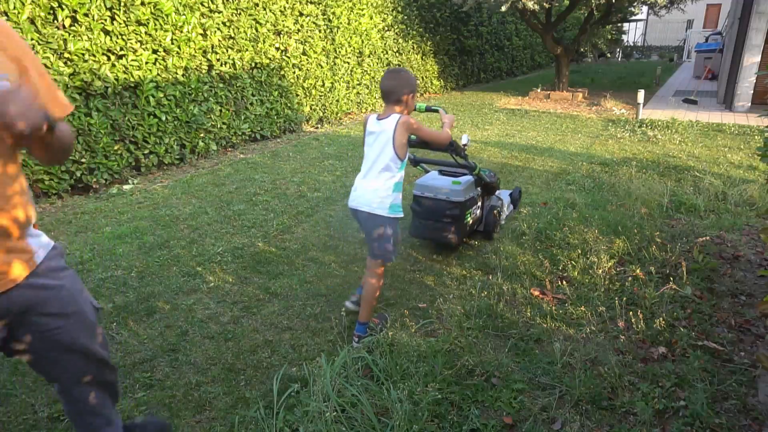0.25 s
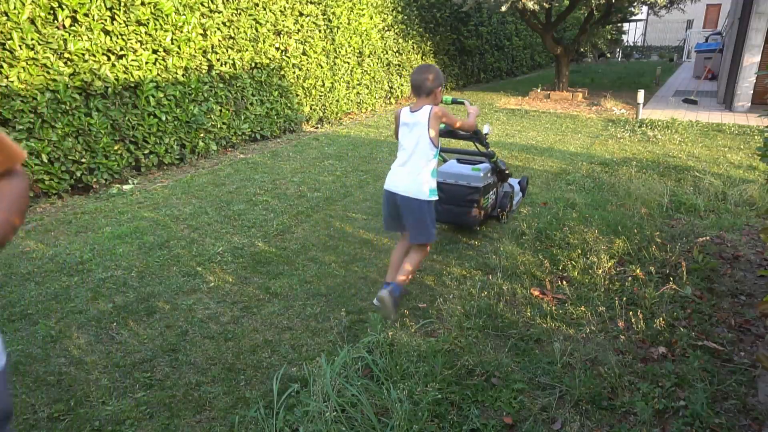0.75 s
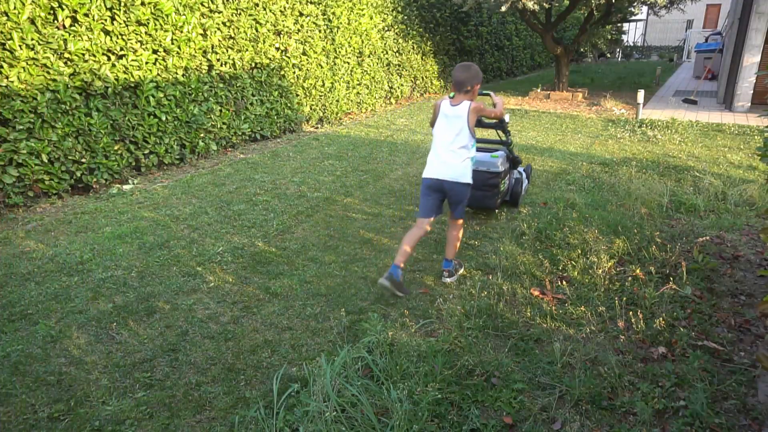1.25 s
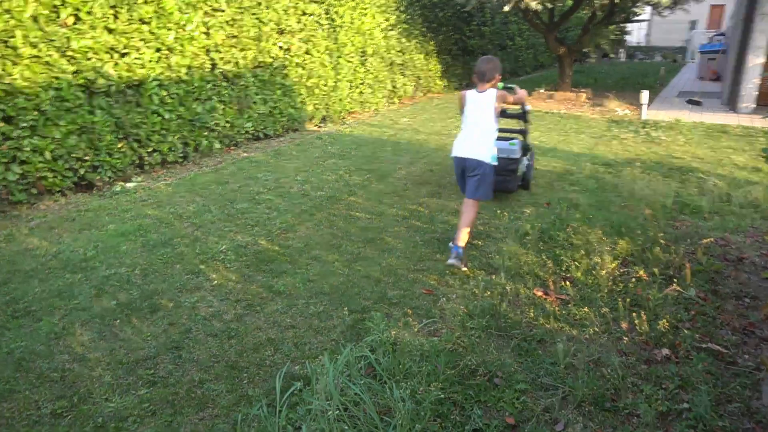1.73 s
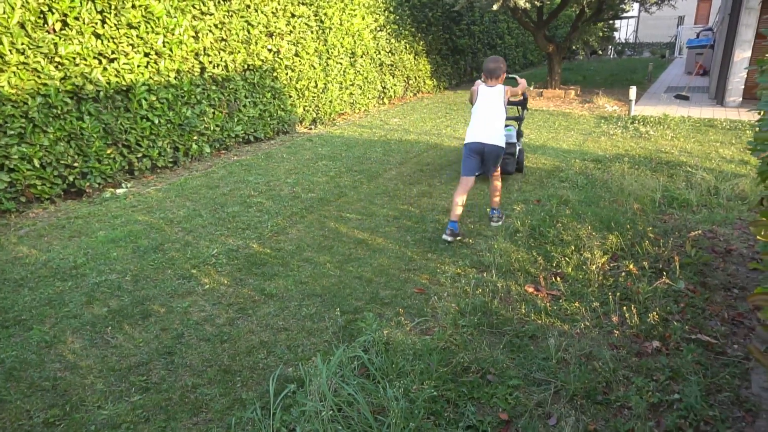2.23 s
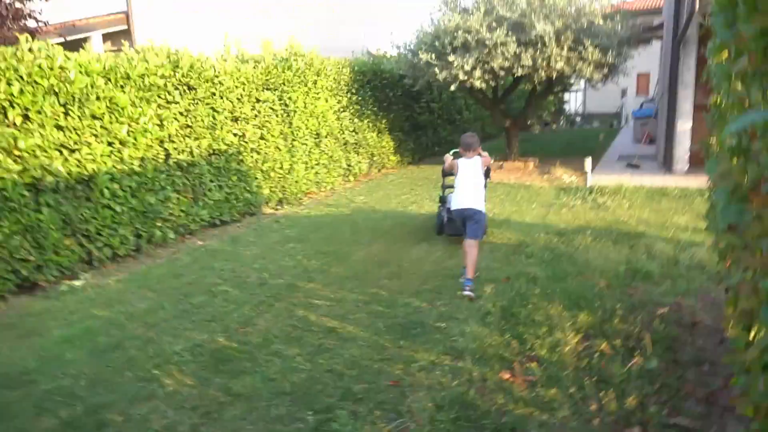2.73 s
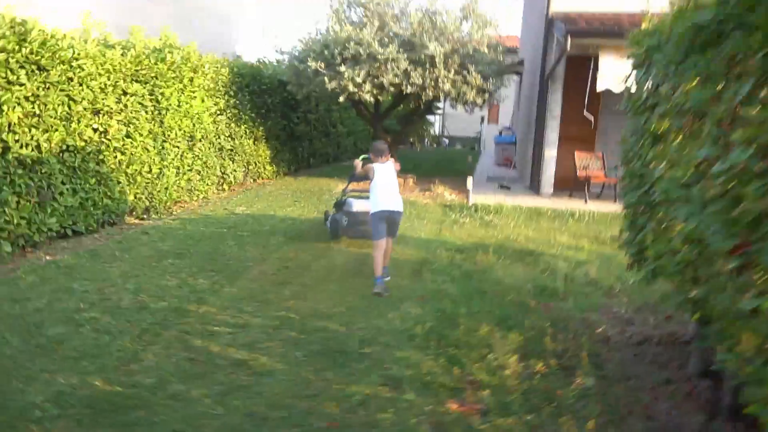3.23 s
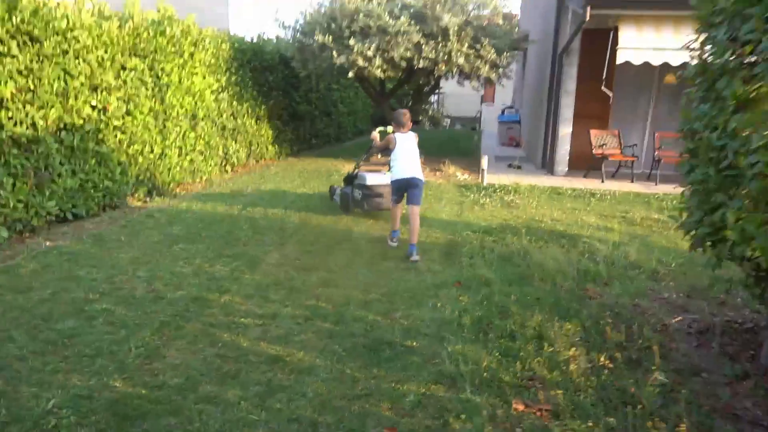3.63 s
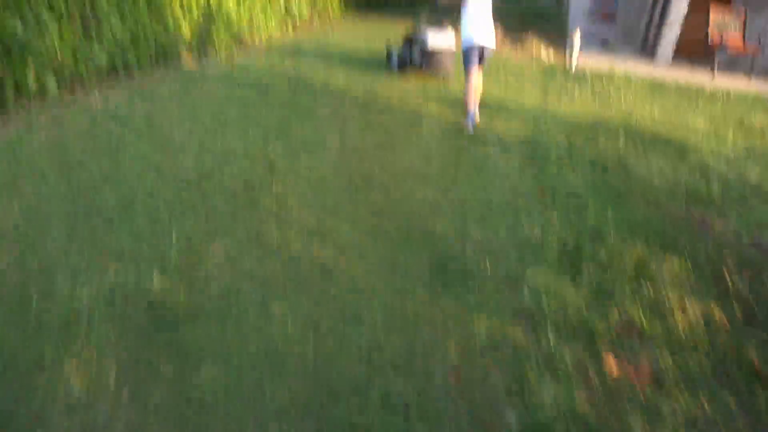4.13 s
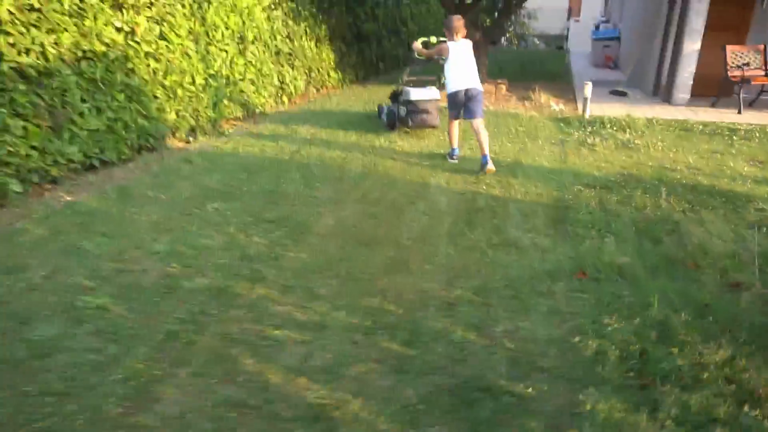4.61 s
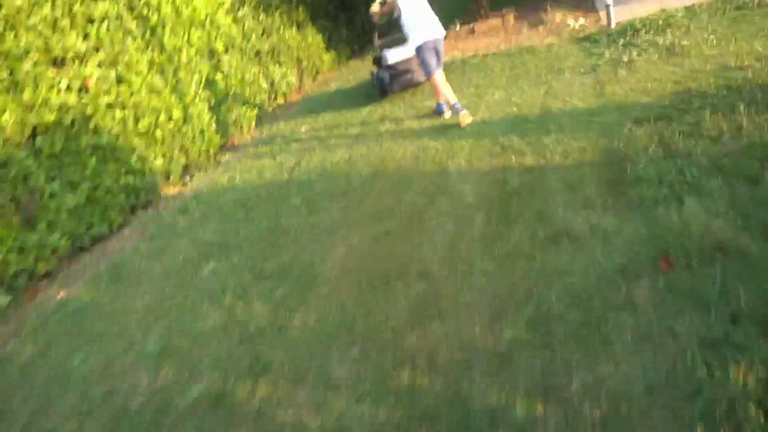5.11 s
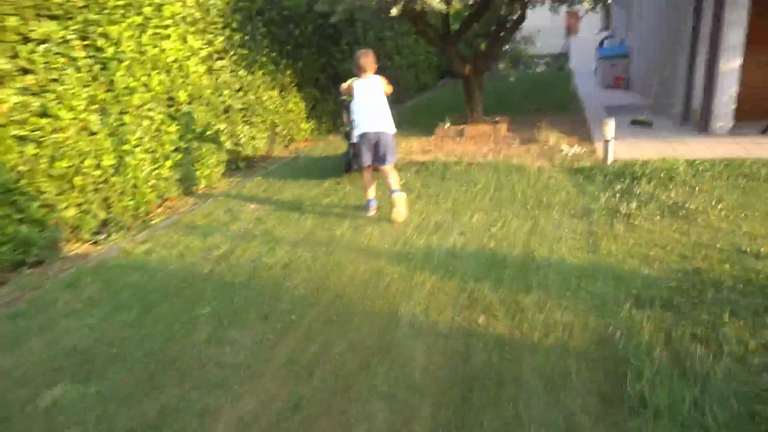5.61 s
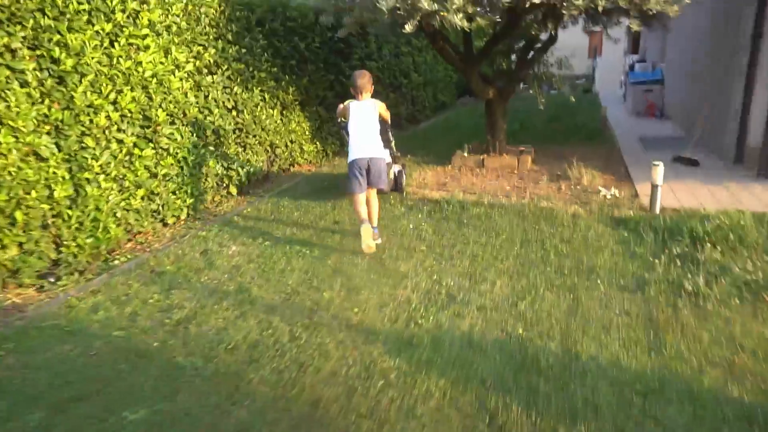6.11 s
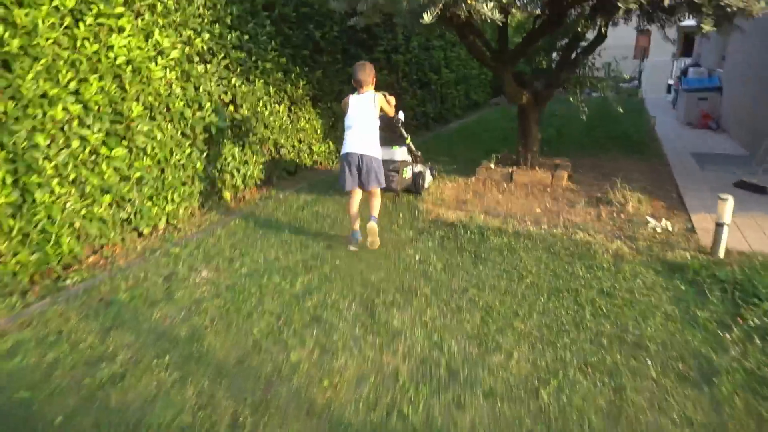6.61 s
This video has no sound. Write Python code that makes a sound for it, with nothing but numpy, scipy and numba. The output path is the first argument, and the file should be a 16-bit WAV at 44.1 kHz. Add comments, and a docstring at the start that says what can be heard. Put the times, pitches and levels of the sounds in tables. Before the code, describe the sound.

In a garden, a battery mower runs continuously with a low hum around 100 Hz, pulsing airy rush and hissing shredded grass. It draws away as bits tick on its housing. A hard bright clack cracks close by before three seconds, with tiny bounces. Wind then thumps and rumbles on the hand-held microphone, while grass rustles and stems snap under following feet.

```python
"""A battery lawn mower is pushed away across a garden lawn, followed on foot by a hand-held camera.
Its two-armed blade hums as sine lines and blurred overtones; air under the deck is coloured noise that
puffs with each arm; shredded grass is hiss and fine crackle; bits tick against the housing as noise bursts.
Grass rustles underfoot as clumped grains, something hard clacks close by in short modes and noise;
slow and fast swirls of noise are wind that buffets the microphone and briefly chokes it."""
import sys
import numpy as np
from scipy import signal
from scipy.fft import rfft, irfft, next_fast_len
from scipy.io import wavfile
from scipy.ndimage import uniform_filter1d, map_coordinates
from numba import njit

SR = 44100
rng = np.random.default_rng(int(sys.argv[2]) if len(sys.argv) > 2 else 0)


def waveform_to_disk(signal):
    """Save audio, clipped to [-1, 1], as 16-bit WAV at the path in sys.argv[1]."""
    frames = np.transpose(np.atleast_2d(signal))
    scaled = np.clip(frames, -1, 1) * 32767
    samples = np.round(scaled).astype(np.int16)
    wavfile.write(sys.argv[1], SR, samples)


N = 302251
TIME = np.arange(N) / SR
# reference level of the rush of air with the mower far off (dB)
FAR_DB = -28
# colour of the crack of a hard blow: hz, density_db (dB per Hz)
CRACK_COLOUR = [(1200, -33), (2200, 0.5), (3200, 0), (4000, -10), (4800, 3.5), (6700, 3.5), (7500, -6.5),
                (13500, -8), (15800, -23)]


def undb(db):
    """Decibels to gain."""
    return 10 ** (np.asarray(db) / 20)


def unit(x):
    """Scale to rms 1."""
    return x / np.sqrt(np.mean(x ** 2))


def curves(table):
    """Each column of a timed table, one value a sample."""
    s, *columns = np.transpose(table)
    return [np.interp(TIME, s, column) for column in columns]


def colour(x, spectrum):
    """Filter by (Hz, dB) points, joined along log frequency; the result has rms 1."""
    hz, db = np.transpose(spectrum)
    bins_hz = np.maximum(np.arange(len(x) // 2 + 1) * SR / len(x), 1)
    gain = undb(np.interp(np.log(bins_hz), np.log(hz), db))
    return unit(irfft(rfft(x) * gain, len(x)))


def noise(spectrum):
    """Coloured noise of rms 1."""
    return colour(rng.standard_normal(next_fast_len(N, True)), spectrum)[:N]


def walk(rate):
    """A smooth random wander of rms 1 through `rate` random points a second."""
    points = rng.standard_normal(1024)
    return unit(map_coordinates(points, [TIME * rate], order=2, mode="wrap"))


def fade(t, t60):
    """Exponential decay, 60 dB down after t60 seconds."""
    return np.exp(-np.log(1000) * t / t60)


def add(track, s, sound):
    """Mix a sound into the track at time s."""
    start = int(s * SR)
    track[start:start + len(sound)] += sound[:N - start]


def bell(s, length):
    """A smooth rise and fall around time s, `length` seconds wide at half height."""
    return .5 ** np.minimum((2 * (TIME - s) / length) ** 2, 60)


def swells(events):
    """Overlapping (s, length, dB) swells add in power; gives their joint power."""
    return sum(undb(db) ** 2 * bell(s, length) for s, length, db in events)


def grains(rate, spread_db, spectrum):
    """Tiny snaps at random times, `rate` a second, most small and a few large; rms 1."""
    sizes = undb(spread_db * np.minimum(rng.exponential(size=N), 5))
    signed = sizes * rng.choice([-1, 1], N)
    return colour(signed * (rng.random(N) < rate / SR), spectrum)


def bursts(events, spectrum, t60, tail_db=-18, tail_t60=0.078):
    """Each blow is a sharp burst of coloured noise with a faint, longer tail."""
    out, t = np.zeros(N), TIME[:SR // 8]
    decay = fade(t, t60) + undb(tail_db) * fade(t, tail_t60)
    for s, peak_db in events:
        burst = colour(rng.standard_normal(len(t)), spectrum) * decay
        add(out, s, undb(peak_db) * burst / np.abs(burst).max())
    return out


def blade_tones(phase, hum_db, air_db, waver=0.11, flutter_db=1.0, hum_flutter_db=1.1):
    """Two low lines, once and twice the blade-pass rate, hum; turbulence blurs the overtones above."""
    # the blade-pass fundamental, as loud as it arrives, before its flutter: time_s, level_db (rms)
    drone = [(0, -26), (.6, -25.5), (1.7, -24.5), (2.3, -25.5), (3, -29), (3.5, -26.5), (5.3, -29),
             (5.8, -34), (6.4, -35)]
    # higher lines: multiple (rounded to a whole one), far_level_db, gain in dB per dB of air swell
    overtones = [(2.95, -37, 1.5), (3.94, -37, 0), (5, -42.5, 1.5), (6, -45, 0.6), (7, -45.5, 1.6),
                 (8, -48, 1), (10, -50.5, 1.6), (30, -62, 1.5)]
    drone_db, = curves(drone)
    out = undb(drone_db + flutter_db * walk(4.57)) * np.sin(phase)
    out = out + undb(hum_db + hum_flutter_db * walk(14)) * np.sin(2 * phase)
    for multiple, far_db, swell in overtones:
        blur = min(waver * multiple, 1)
        turbulence = 1 + blur * (walk(16) + 1j * walk(16))
        line = turbulence * np.exp(1j * (round(multiple) * phase + rng.uniform(0, 2 * np.pi)))
        level = undb(far_db + swell * (air_db - FAR_DB))
        out = out + level * line.imag / np.sqrt(1 + 2 * blur ** 2)
    return np.sqrt(2) * out  # sine levels count as rms


def churn(x, width_hz=150):
    """Turbulence makes each narrow band of the midrange swell and sink on its own."""
    size = next_fast_len(N, True)
    spectrum, out = rfft(x, size), x
    hz = np.arange(size // 2 + 1) * SR / size
    for centre_hz in np.arange(400, 2700, width_hz):
        window = np.maximum(1 - np.abs(hz - centre_hz) / width_hz, 0)
        band = irfft(spectrum * window, size)[:N]
        out = out + band * (undb(2.2 * walk(26)) - 1)
    return out


def deck_air(phase, air_db, depth=0.11, sharpness=2.2, gain_db=1.5, flutter_db=0.42,
             howl_hz=975, howl_db=-23.0, howl_swell=2.0):
    """Churned air hisses and puffs as each blade arm passes the chute; nearer by, the deck howls too."""
    # air under the deck: hz, density_db (dB per Hz)
    air_colour = [(100, -4), (180, 3), (250, 5), (290, 3), (620, 0.13), (850, -2), (970, -1.3),
                  (1300, -2.5), (1800, -10), (2350, -14), (2850, -22.5), (6000, -28.5), (15000, -44.5)]
    howl = noise([(howl_hz / 2, -140), (howl_hz, 0), (howl_hz * 2, -140)])
    howl_gain = undb(howl_db + howl_swell * (air_db - FAR_DB))
    rush = churn(noise(air_colour) + howl * howl_gain)
    body = uniform_filter1d(rush, size=9)  # the puffs lack the treble
    puff = np.exp(sharpness * np.cos(phase))
    puffing = rush + body * depth * unit(puff - puff.mean())
    return puffing * undb(air_db + gain_db + flutter_db * walk(70))


def over_lawn(x, distance_m, deck_m=.2, microphone_m=1.37, ground_db=-21.5):
    """Sound arrives directly and off the ground; the lag shrinks with distance, so the colour shifts."""
    lag_s = 2 * deck_m * microphone_m / distance_m / 343  # speed of sound in m/s
    return x + undb(ground_db) * np.interp(TIME - lag_s, TIME, x)


def grass(phase, grass_db, sweep=0.09, hiss_db=0, crackle_db=-4, patchy_db=1.2):
    """Each sweep of the blade snips many stalks: a hiss with a fine crackle of larger snips."""
    # shredded grass: hz, density_db (dB per Hz)
    grass_colour = [(1500, -6), (2350, 8), (2800, 6.5), (5300, 5), (6900, 2), (8700, 5.5), (10000, -6.5),
                    (11200, -9.5), (13200, -4), (15800, -19)]
    cutting = unit(np.exp(sweep * np.cos(phase) + 0.052 * np.cos(2 * phase)))
    snips = grains(rate=1400, spread_db=4.0, spectrum=grass_colour)
    shredding = undb(hiss_db) * noise(grass_colour) + undb(crackle_db) * snips
    return shredding * cutting * undb(grass_db + patchy_db * walk(25))


def mower(air_1m_db=-12, hum_1m_db=-8.5):
    """Hum, air and grass turn with the blade and weaken with distance; the fundamental has set levels."""
    # the blade's speed drifts by less than one percent: time_s, blade_pass_hz
    speed = [(0, 100), (1.7, 99.55), (2.5, 99.35), (3.15, 100.15), (4.3, 99.8), (5.3, 99.9), (5.6, 99.55),
             (6.4, 99.9)]
    # the mower draws away, then the camera keeps pace: time_s, distance_m
    path = [(0, 3.8), (1.25, 4.06), (1.8, 4.44), (2.25, 5.85), (3.05, 6.9), (3.55, 6.44), (4.4, 7.2),
            (5.3, 6.04), (5.9, 6.35), (6.85, 6.7)]
    # how much grass the blade meets: time_s, hiss_level_db (at 1 m, before its patchiness)
    cutting = [(0, -27), (2.14, -28), (2.35, -32.5), (3.05, -37), (4, -32.5), (5.17, -33), (5.6, -32.5),
               (6.85, -26.5)]
    # the hum swells or sinks for a moment: centre_s, length_s, change_db
    hum_swells = [(.40, 0.15, -3), (1.743, 0.16, 1.5), (2.948, 0.56, -3.5), (3.39, 0.15, 2.5),
                  (3.666, 0.12, 4.5), (4.124, .1, -2), (4.265, 0.12, 6.5), (5.25, .16, 0),
                  (5.682, 0.15, 3.5), (5.974, 0.058, 5), (6.216, 0.068, 5), (6.68, 0.49, 2.5)]
    blade_hz, = curves(speed)
    distance_m, = curves(path)
    cutting_db, = curves(cutting)
    phase = 2 * np.pi * np.cumsum(blade_hz) / SR
    loss_db = 20 * np.log10(distance_m)
    air_db = air_1m_db - loss_db
    hum_db = hum_1m_db - loss_db + sum(db * bell(s, length) for s, length, db in hum_swells)
    air = over_lawn(deck_air(phase, air_db), distance_m)
    return blade_tones(phase, hum_db, air_db) + air + grass(phase, cutting_db - loss_db)


def wind(buffet_db=-2.5, eddies_db=0.0, eddy_floor_db=-44):
    """Swirls push on the microphone; each gust has its own share of slow buffeting and faster eddies."""
    # slow buffeting: hz, density_db (dB per Hz)
    buffet_colour = [(6, 3.5), (14, 10), (36, 0), (50, -21), (75, -22), (200, -74)]
    # its faster eddies: hz, density_db (dB per Hz)
    eddy_colour = [(24, -9), (36, 4), (50, 7.5), (72, -2), (105, -14.5), (400, -92)]
    # gusts, before the two gains: centre_s, length_s, buffet_level_db, eddy_level_db
    gusts = [(0.995, 0.16, -14.5, -37), (1.79, 0.1, -7, -21), (2.017, 0.041, -2.5, -26),
             (2.16, 0.11, -6.5, -31), (2.413, 0.067, -8, -25), (2.59, 0.041, -2, -20),
             (2.856, 0.088, -11, -22), (3.028, 0.06, -0.5, -12.5), (3.196, 0.096, -5.5, -11),
             (3.356, 0.065, -5, -20), (3.703, 0.15, -12, -20), (3.878, 0.039, 0.5, -21),
             (4.573, 0.25, -6.5, -31), (5.355, 0.062, -3.5, -29), (5.578, 0.1, 3.5, -11),
             (5.735, 0.093, -27, -10), (5.92, 0.1, -1.5, -20), (6.118, 0.14, -3.5, -15.5),
             (6.328, 0.089, -1.5, -8.5), (6.744, 0.095, -4.5, -19.5)]
    # the breeze rises once and then stays
    breeze_s, rise_s, calm_db, breeze_db = 1.745, .04, -24.5, -13
    steady_db = np.interp(TIME, [breeze_s, breeze_s + rise_s], [calm_db, breeze_db])
    slow = undb(steady_db) ** 2 + swells((s, length, db) for s, length, db, _ in gusts)
    fast = undb(eddy_floor_db) ** 2 + swells((s, length, db) for s, length, _, db in gusts)
    out, puffs = 0, unit(undb(3 * walk(22)))
    layers = ((buffet_colour, slow, buffet_db, SR // 8), (eddy_colour, fast, eddies_db, SR // 16))
    for spectrum, power, gain_db, span in layers:
        swirl = noise(spectrum) * puffs
        # even out the local power, so that the gusts set it
        local_power = uniform_filter1d(swirl ** 2, size=span)
        out = out + swirl * np.sqrt(power / local_power) * undb(gain_db)
    # the diaphragm stiffens under the hardest pushes
    return .9 * np.tanh(out / .9)


def ticks():
    """Bits of stalk and twig snap against the housing: short bright bursts of noise."""
    # the ticks: start_s, peak_db
    tick_times = [(.955, -20), (1.001, -26), (1.127, -21), (1.182, -22), (1.314, -25), (1.419, -21),
                  (1.558, -25), (1.754, -16), (1.820, -21.5), (4.232, -31), (6.204, -18), (6.366, -18.5)]
    # their colour: hz, density_db (dB per Hz)
    tick_colour = [(800, -35), (2500, 7.5), (5000, -0.5), (8300, 6), (10500, -5.5), (13500, 1),
                   (15800, -15)]
    return bursts(tick_times, tick_colour, t60=0.016)


def knocks():
    """A dull knock: a burst of low noise that dies more slowly than a tick."""
    # the knocks: start_s, peak_db
    knock_times = [(1.757, -5.5)]
    # their colour: hz, density_db (dB per Hz)
    knock_colour = [(60, -14), (240, 9), (650, -7), (2400, -13), (8000, -53)]
    return bursts(knock_times, knock_colour, t60=0.056)


def clack(start_s=2.7776, gain_db=2, crack_db=-3.0, crack_t60=.018, ring_db=-5, wash_db=-22.5,
          wash_t60=0.19, late_wash_s=0.03, late_wash_db=-27, late_wash_t60=0.11):
    """Something hard cracks and rings in short modes; a wash of scattered sound follows in two waves."""
    # what it rings with: hz, relative_level_db, t60_s
    modes = [(1890, -4, .025), (2260, 4, 0.036), (2590, -3, 0.042), (3515, -8.5, 0.08), (4560, -3, 0.038),
             (5600, -12, 0.1), (5900, 0, 0.026), (6400, -3, 0.052)]
    # colour of the wash: hz, density_db (dB per Hz)
    wash_colour = [(1500, -18), (3500, -7), (5700, -1), (7400, -7), (13500, -17), (15800, -24)]
    out, t = np.zeros(N), TIME[:SR // 3]
    ring = 0
    for hz, db, t60 in modes:
        ring = ring + undb(db) * np.sin(2 * np.pi * hz * t + rng.uniform(0, 2 * np.pi)) * fade(t, t60)
    crack = undb(crack_db) * fade(t, crack_t60) * colour(rng.standard_normal(len(t)), CRACK_COLOUR)
    # scattered sound builds up as farther surfaces answer
    scatter = undb(wash_db) * (1 - fade(t, 0.051)) * fade(t, wash_t60)
    # a second, fainter wash of noise sets in 30 ms after the crack
    late_wash = undb(late_wash_db) * (t > late_wash_s) * fade(np.abs(t - late_wash_s), late_wash_t60)
    # 7000 reflections a second
    reflections = rng.standard_normal(len(t)) * (rng.random(len(t)) < 7000 / SR)
    wash = np.hypot(scatter, late_wash) * colour(reflections, wash_colour)
    add(out, start_s, undb(gain_db) * (undb(ring_db) * ring / np.abs(ring).max() + crack + wash))
    return out


def bounces(crack_db=-7):
    """Each small bounce after the clack is a faint crack with a brief, thin ring in one mode."""
    # the bounces: start_s, ring_hz, ring_level_db, t60_s
    bounce_times = [(2.8635, 5750, -26.5, .014), (2.9090, 5360, -33, .035)]
    out, t = np.zeros(N), TIME[:SR // 8]
    for s, hz, db, t60 in bounce_times:
        crack = undb(crack_db) * colour(rng.standard_normal(len(t)), CRACK_COLOUR)
        add(out, s, undb(db) * (np.sin(2 * np.pi * hz * t) + crack) * fade(t, t60))
    return out


def footsteps(gain_db=4.5, clump_db=3.0):
    """Blades of grass crackle in clumps under each step of the person following."""
    # swishes of the feet, before the gain: centre_s, length_s, level_db
    steps = [(3.76, 0.099, -50), (4.3, 0.23, -51), (4.46, 0.066, -48), (4.86, 0.074, -47),
             (4.99, 0.099, -49), (5.335, 0.07, -47.5), (5.5, 0.28, -49), (6.2, 0.23, -47.5),
             (6.49, 0.23, -48), (6.65, 0.16, -44), (6.81, 0.074, -43)]
    # grass crackling underfoot: hz, density_db (dB per Hz)
    rustle_colour = [(1200, 3), (2300, 15.5), (3200, 6), (5300, 8.5), (6700, 2), (8900, 9), (10700, -2),
                     (11900, 4), (13600, 3), (15800, -8)]
    crackle = grains(rate=2600, spread_db=3.6, spectrum=rustle_colour)
    return crackle * np.sqrt(swells(steps)) * undb(gain_db + clump_db * walk(160))


def scuffs(spread_s=0.035, width_hz=140):
    """Scuffs, and at 4.40 s a low-mid swell of noise: brief, stuttering noise around one resonance."""
    # the scuffs and the swell: centre_s, resonance_hz, level_db (at the height of each)
    scuff_times = [(3.79, 6000, -46), (4.27, 7200, -47), (4.40, 790, -30), (4.745, 1560, -33),
                   (6.675, 1120, -27.5)]
    out, stutter = 0, unit(undb(4 * walk(90)))
    for s, hz, db in scuff_times:
        band = noise([(hz / 2, -18), (hz - width_hz, 0), (hz + width_hz, 0), (hz * 2, -30)])
        swell = np.exp(-.5 * ((TIME - s) / spread_s) ** 2)
        out = out + band * stutter * undb(db) * swell
    return out


def snaps():
    """Dry stems crack underfoot: very short bursts of treble noise."""
    # the snaps: start_s, peak_db
    snap_times = [(3.970, -29), (4.440, -31), (4.959, -28), (4.982, -27), (5.596, -27), (5.616, -31),
                  (6.104, -32), (6.474, -24), (6.501, -30), (6.528, -28), (6.608, -26), (6.641, -19.5),
                  (6.705, -30), (6.751, -31), (6.801, -27)]
    # colour of a cracking stem: hz, density_db (dB per Hz)
    snap_colour = [(4000, -22), (8700, 9.5), (10500, -4), (13200, 1), (15800, -7)]
    return bursts(snap_times, snap_colour, t60=0.012)


def microphone_passing():
    """A choked microphone lets through almost nothing but the slow swell of the wind."""
    # moments when a gust chokes it: start_s, length_s
    chokes = [(5.4665, .0165), (6.339, .004), (6.7535, .006)]
    choked = sum(1. * ((TIME > s) & (TIME < s + length)) for s, length in chokes)
    softened = uniform_filter1d(uniform_filter1d(choked, size=32), size=32)
    return 1 - .98 * softened


@njit
def follow_peaks(x, attack, release):
    """An envelope that leaps up with each peak and sinks back slowly."""
    out, e = np.empty(len(x)), 0.
    for i in range(len(x)):
        size = abs(x[i])
        e += (size - e) * attack if size > e else -e * release
        out[i] = e
    return out


def scene(squeeze=.25):
    """Mower, steps, small blows and wind as they reach the microphone."""
    blows = ticks() + knocks() + clack() + bounces() + snaps()
    sounds = mower() + footsteps() + scuffs() + blows
    # each hard push of wind squeezes the other sounds, by the share `squeeze` at a push of 1
    push = wind()
    return (sounds * microphone_passing() * (1 - squeeze * push ** 2) + push)[None]


def record(dry, release_s=0.02, top_hz=15800):
    """The camera's limiter ducks briefly after an overload; what slips past is clipped; the top is cut."""
    peaks = follow_peaks(dry[0], 1 / 5, 1 / (release_s * SR))  # rises over some 5 samples
    limited = np.clip(dry / np.maximum(peaks, 1), -1, 1)
    top_cut = signal.ellip(10, .1, 80, top_hz, fs=SR, output="sos")
    return signal.sosfilt(top_cut, limited)


dry = scene()
out = record(dry)
waveform_to_disk(out)
```